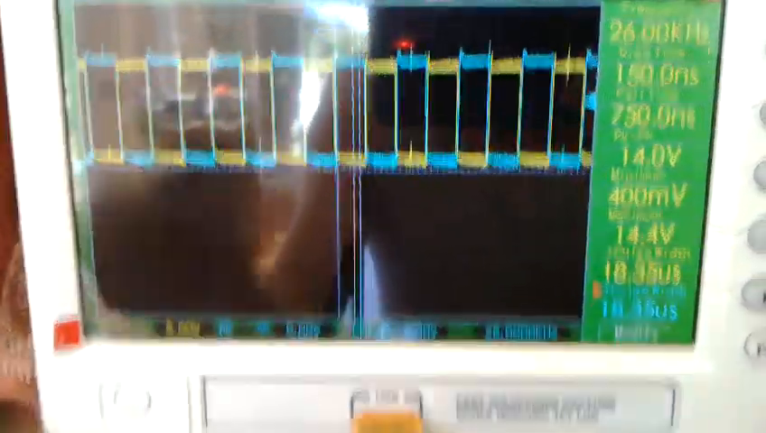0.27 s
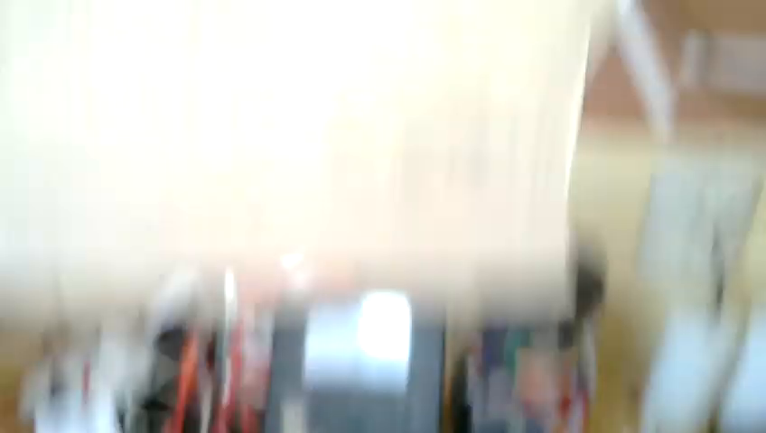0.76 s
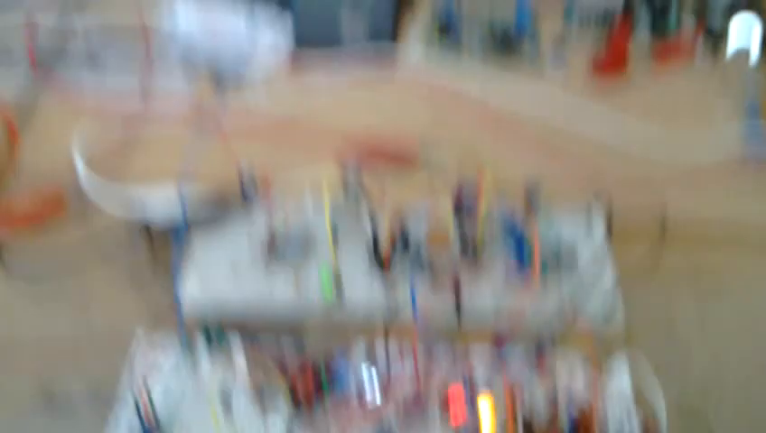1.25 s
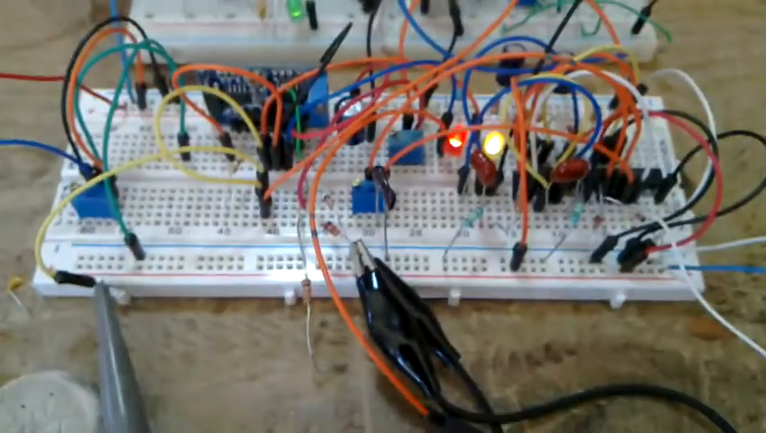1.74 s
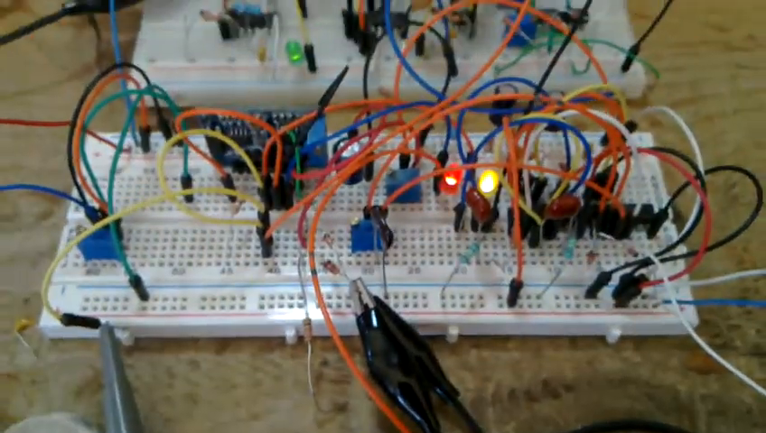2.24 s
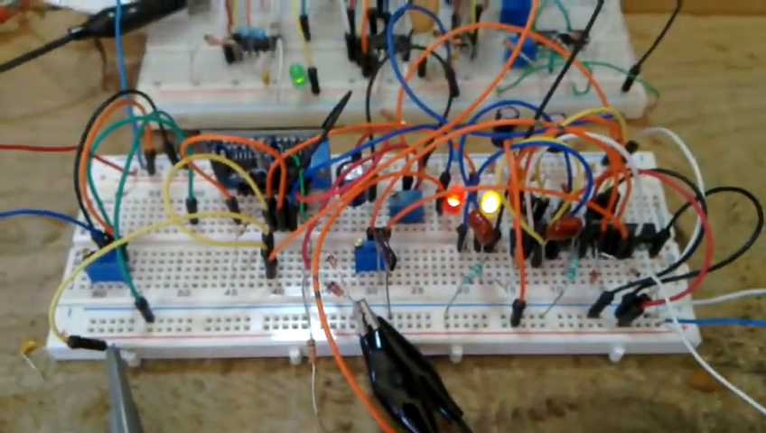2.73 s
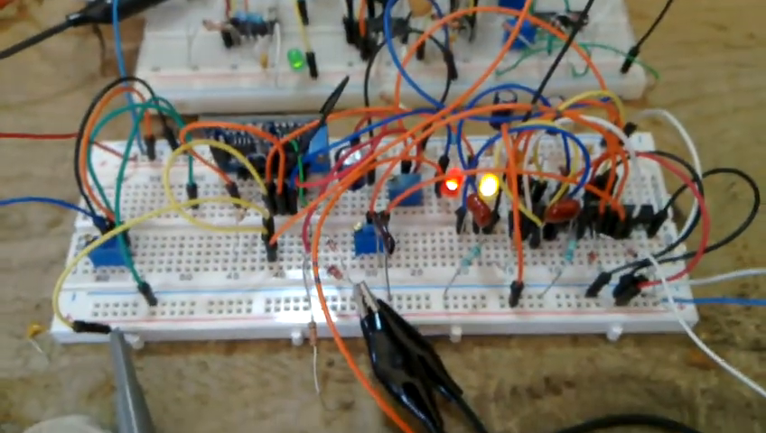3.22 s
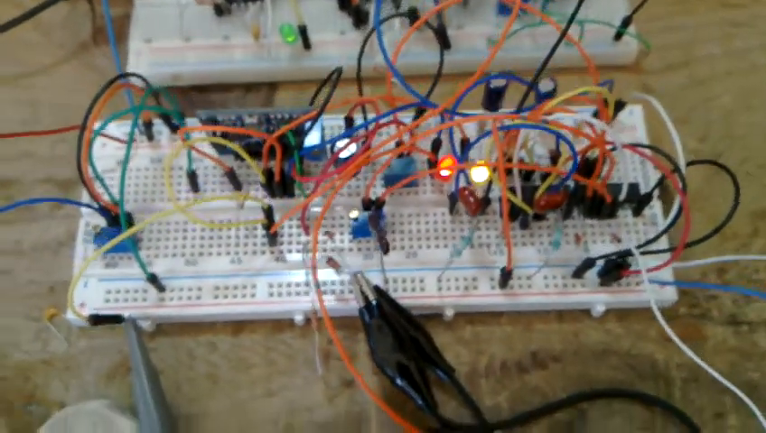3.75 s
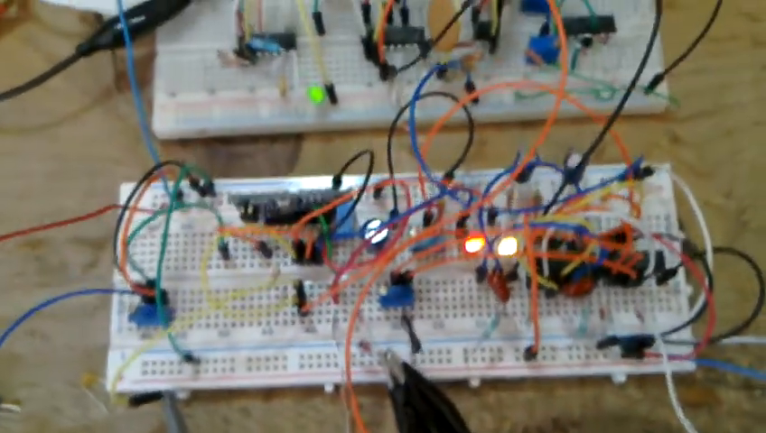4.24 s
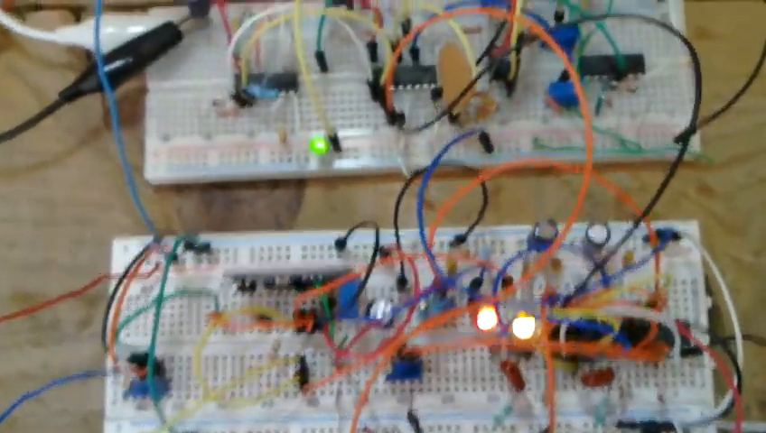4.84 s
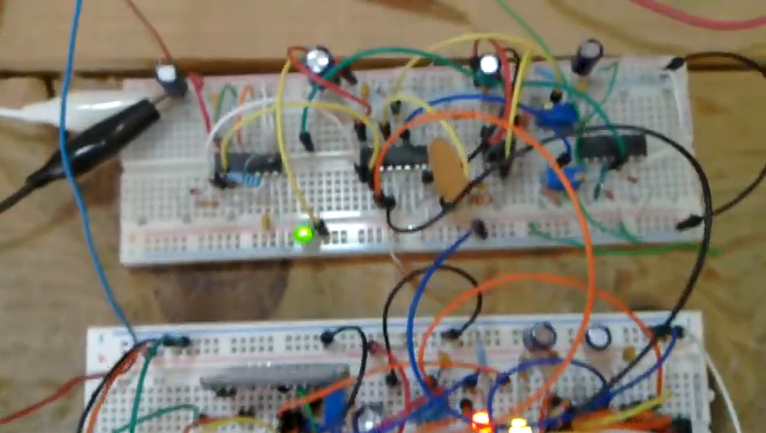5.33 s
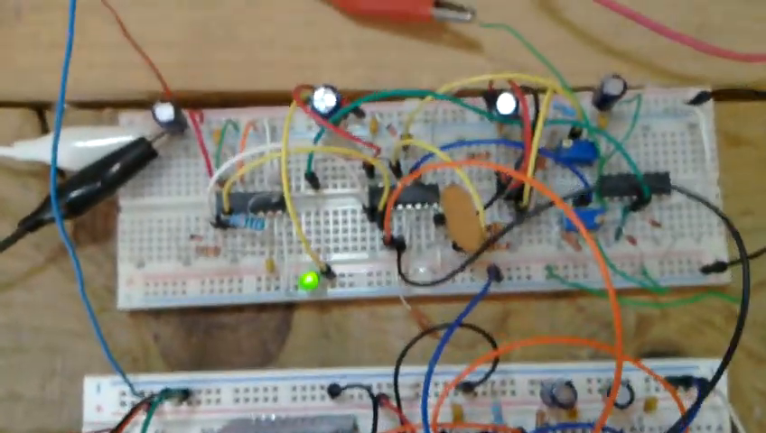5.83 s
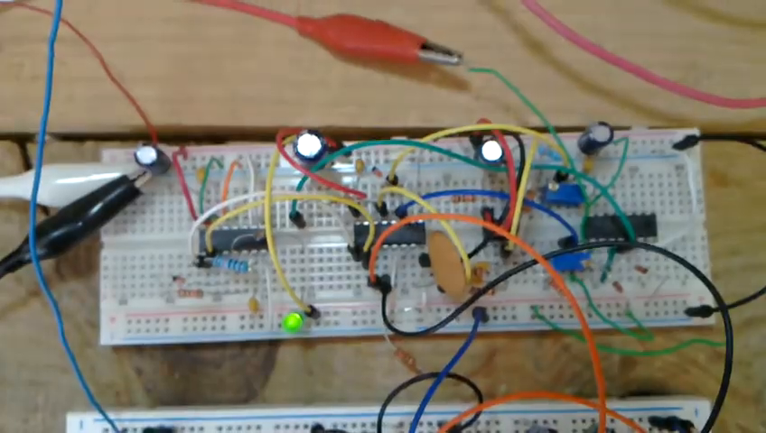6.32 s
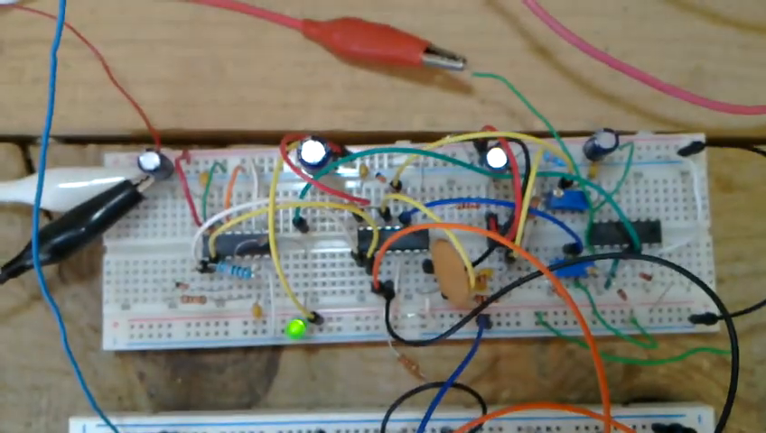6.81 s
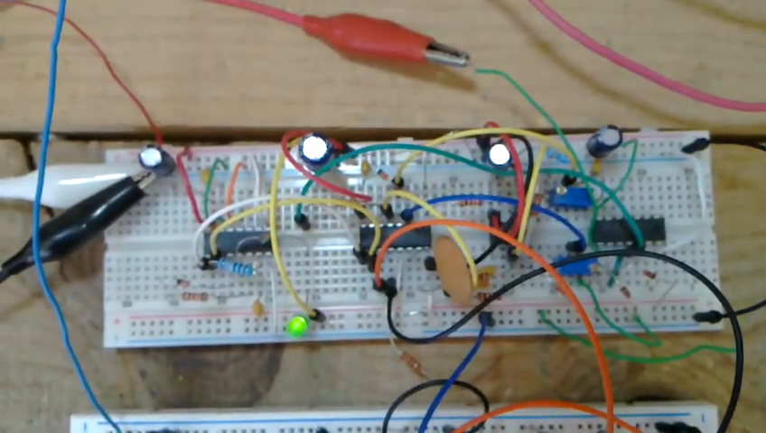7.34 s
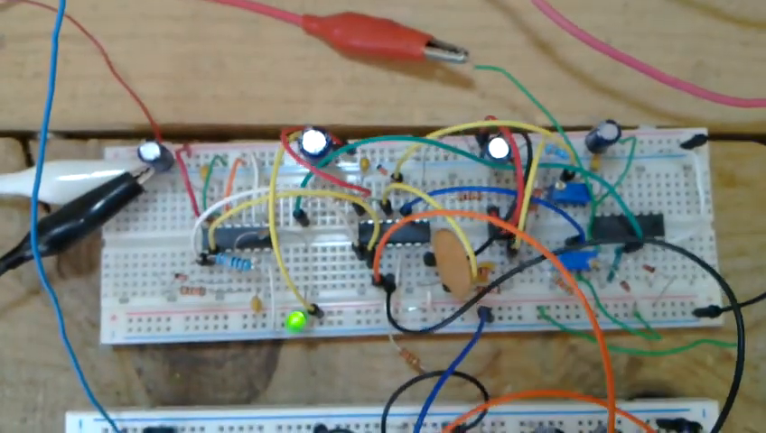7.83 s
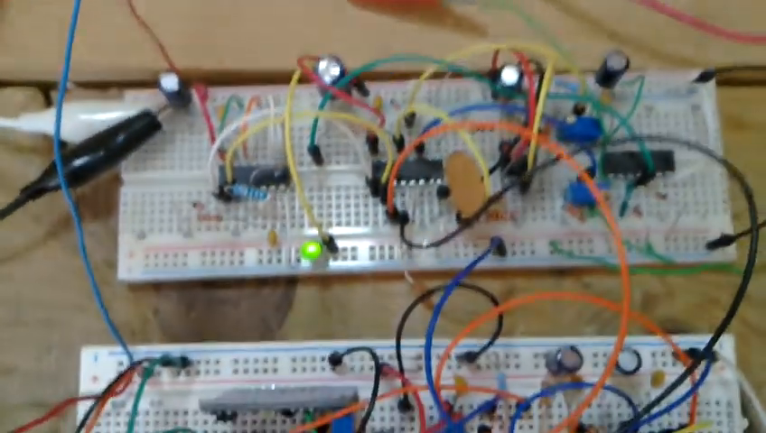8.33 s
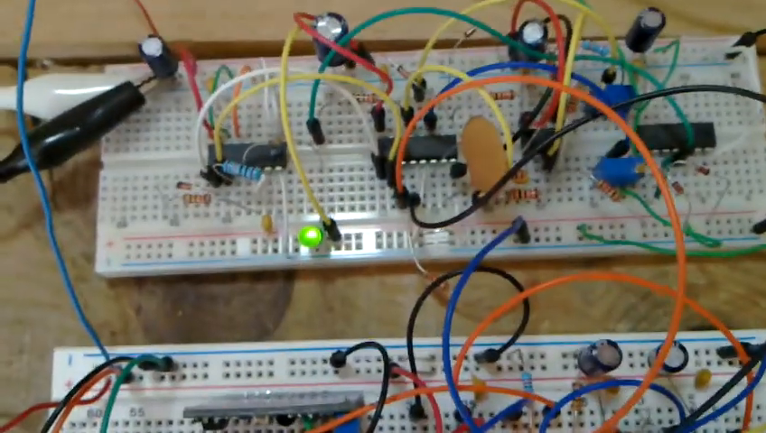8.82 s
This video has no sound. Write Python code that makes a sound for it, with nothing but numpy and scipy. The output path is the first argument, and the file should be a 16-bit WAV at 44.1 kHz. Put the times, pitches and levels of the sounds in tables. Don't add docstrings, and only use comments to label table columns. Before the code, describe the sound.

Steady electrical-sounding fan hum with wavering breathy hiss on a workbench, a sharp knock early on, smaller clicks later, and low distant traffic drone.

```python
import sys
import numpy as np
from scipy import signal
from scipy.fft import rfft, irfft, next_fast_len
from scipy.io import wavfile
from scipy.ndimage import uniform_filter1d

SR = 44100
rng = np.random.default_rng(int(sys.argv[2]) if len(sys.argv) > 2 else 0)


def elevation(decibels):
    levels = np.asarray(decibels, float)
    return 10 ** (levels / 20)


def pcm_store(signal):
    levels = np.round(np.clip(np.atleast_2d(signal), -1, 1) * 32767)
    wavfile.write(sys.argv[1], SR, levels.astype(np.int16).T)


N = 399987
T = np.arange(N) / SR

# (time [s], place [0 scope, 1 near board, 2 between, 3 far board], aim at the fan [dB],
# echo crest [Hz], closeness [dB])
HAND_PATH = [(0, 0, -11, 4170, -0.5), (.45, -0.06, -9, 4220, -0.5), (.73, 1.42, 1, 4230, -7),
             (.86, 0.5, 5.5, 4300, 1), (1.08, 1.37, 1, 4400, -1), (1.45, 1.5, -1, 4380, 1),
             (2.7, 1, 0, 4420, -0.5), (3.5, 1.08, 1.5, 4280, -1), (4.0, 1.5, -3.5, 3800, -1),
             (4.5, 2.5, -6, 3600, 1), (5.2, 2, 0, 3800, 0.5), (5.7, 2.5, .5, 3920, 1),
             (6.2, 4, .5, 3810, .5), (7.1, 5, .5, 3820, 0), (8.2, 2.5, 1.5, 3820, 0.5),
             (8.65, 2.5, 0, 4250, 0.5), (9.07, 2.5, 0, 4330, -0.5)]
# (multiple of the pitch, level at scope [dB], near board [dB], between [dB], far board [dB])
MOTOR_TONES = [(1, -66, -51, -49.5, -51.5), (3, -64.5, -56, -61, -64), (4, -63.5, -55, -56.5, -68),
               (5, -66.5, -52.5, -56.5, -57), (2, -64, -66.5, -71, -72.5), (10, -79.5, -63.5, -71, -60.5),
               (15, -74, -62, -69.5, -60), (20, -109, -76.5, -84.5, -91), (6, -73.5, -71.5, -78, -82),
               (8, -87, -70.5, -74, -76), (12, -81, -67.5, -78, -94), (18, -105, -79, -90, -78.5),
               (7, -82, -76, -81, -73.5)]


def evened(x):
    return x / np.sqrt(np.mean(x ** 2) + 1e-20)


def read(points, hz):
    f, value = np.transpose(points)
    return np.interp(np.log(hz + 1), np.log(f + 1), value)


def columns(rows, t):
    s, *rest = np.transpose(rows)
    return np.array([np.interp(t, s, c) for c in rest])


def bump(x, centre, half_width):
    return np.exp(-((x - centre) / half_width) ** 2)


def wander(low_hz, top_hz, t):
    rates, turns = np.geomspace(low_hz, top_hz, num=24), rng.random(24)
    return evened(np.sin(2 * np.pi * (np.outer(t, rates) + turns)).sum(1))


def slow(low_hz, top_hz):
    return np.interp(T, T[::200], wander(low_hz, top_hz, T[::200]))


def noise(field_db, size=1024):
    hop = size // 4
    hz, s = np.fft.rfftfreq(size, 1 / SR), np.arange(N // hop + 5) * hop / SR
    a, b = rng.standard_normal((len(s), len(hz), 2)).T
    spectrum = (a + 1j * b) * elevation(field_db(hz[:, None], s))
    return signal.istft(spectrum, nperseg=size, noverlap=size - hop)[1][:N]


def ring(hz, t60, length=3000):
    t = np.arange(length) / SR
    return elevation(-60 * t / t60) * np.sin(2 * np.pi * hz * t)


def add(mix, s, sound):
    part = mix[round(s * SR):][:len(sound)]
    part += sound[:len(part)]


def at_place(values, s):
    return np.interp(columns(HAND_PATH, s)[0], np.arange(len(values)), values)


def air_change(hz, s):
    centres_hz = [600, 2200, 4000, 5600]
    follows = [0.027, 0.19, 0.93, 0.52]
    share = np.interp(np.log(hz + 1), np.log(centres_hz), follows)
    return np.outer(share, columns(HAND_PATH, s)[1] + 1.83)


def tone_db(multiple, s):
    # (time [s], multiple, half length [s], level [dB])
    nodes = [(0.53, 1, 0.05, -12), (0.59, 1, 0.17, -10), (0.65, 3, 0.35, 6.5), (1.125, 3, 0.12, -15.5),
             (3.81, 3, 0.22, -10), (0.68, 4, 0.32, 6), (0.96, 4, 0.052, -16), (1.29, 4, 0.13, 3.5),
             (4.02, 4, 0.22, 2.5), (0.17, 5, 0.046, -16), (0.49, 5, 0.051, 7.5), (0.88, 5, 0.17, 5),
             (1.125, 5, 0.074, -17), (4.16, 5, .07, -9), (3.15, 5, 0.37, 3.5), (0.66, 15, 0.28, 11.5),
             (1.11, 15, 0.087, -30), (2.96, 15, 0.11, 4.5), (3.6, 15, 0.074, 0), (4.46, 15, 0.21, -9),
             (5.3, 15, 0.32, 8), (5.18, 10, 0.14, -16.5), (0.83, 10, 0.04, 14), (5.3, 20, .35, 9),
             (8.1, 20, .35, 1), (3.0, 6, 0.28, 7), (8.58, 8, 0.89, 9.5), (9.2, 7, 0.44, 6.5),
             (9.07, 18, .35, 16), (0.92, 12, 0.28, 4),
             (8.84, 1, .9, -2), (4.7, 1, 0.86, 0.5), (.05, 1, 0.22, 2.5), (2.9, 3, 0.71, -4.5),
              (1.14, 3, 0.32, 4), (8.87, 3, 0.33, 3.5), (5.4, 3, 0.12, -3), (5.4, 2, 0.28, -8.5),
              (9.16, 2, 0.41, 4.5), (2.04, 5, 0.29, 2), (4.93, 5, 0.23, -4), (6.05, 5, 0.49, 1.5),
              (6.95, 5, 0.55, -1.5), (0.676, 5, 0.028, -12), (3.75, 10, 0.37, 5), (8.75, 15, 0.21, -3),
              (1.52, 15, 0.11, -12), (5, 4, 0.15, 2), (5, 4, 0.22, -4.5), (9.4, 4, 0.95, 3),
              (1.4, 20, 0.14, 4), (2.3, 20, 0.13, -4), (.66, 2, 0.13, 5.5), (0.84, 15, 0.055, 2.5),
              (.88, 8, .06, 10), (1.15, 8, .1, 6), (.51, 3, .06, 3), (3.5, 20, 0.11, 5), (6.9, 3, .15, 1.5),
              (8.05, 3, .2, -1.5), (4.5, 4, .12, 2.5), (7.7, 4, .2, 2.5), (3.35, 15, .12, -3),
              (0.65, 3, .07, -3), (8.0, 2, .35, -3), (4.65, 2, .2, 2.5), (2.5, 2, .15, -3.5),
              (3.7, 8, 0.16, -5), (7.4, 8, .4, -3), (5.1, 8, .25, 2.5), (1.02, 1, .08, -1.5)]
    levels = next(row[1:] for row in MOTOR_TONES if row[0] == multiple)
    crossed = sum(db * np.exp(-abs((s - at) / half) ** 1.86)
                  for at, k, half, db in nodes if k == multiple)
    return at_place(levels, s) + columns(HAND_PATH, s)[3] + crossed


def motor(gust):
    # (time [s], pitch [Hz])
    pitch_curve = [(0.1, 322.25), (0.45, 321.81), (0.9, 320.95), (1.4, 320.45), (2.1, 320.56),
                   (2.7, 321.27), (3.2, 321.64), (3.7, 321.62), (4.3, 320.88), (4.75, 320.39),
                   (5.3, 320.61), (6.0, 321.61), (6.5, 321.97), (7.2, 322.16), (7.6, 322.09), (8.2, 322.31),
                   (8.7, 322.66), (9.0, 322.61)]
    # (multiple, level [dB])
    faint_tones = [(11, -77.5), (13, -74.5), (14, -80), (16, -81.5), (17, -89), (19, -86.5)]
    gust_share = 0.6
    spread_turns = .15
    hz = columns(pitch_curve, T)[0]
    turns = np.cumsum(hz) / SR + 0.0002 * slow(1.1, 40)
    out = np.zeros(N)
    for k in [row[0] for row in MOTOR_TONES]:
        db = np.interp(T, T[::128], tone_db(k, T[::128]))
        depth_db = min(0.16 * k, 1.7) if k % 5 == 0 else .15
        shiver_db = depth_db * evened(gust_share * gust + (1 - gust_share) * slow(7, 50))
        phase = k * turns + spread_turns * k * k + rng.random() / 20
        out += elevation(db + shiver_db) * np.cos(2 * np.pi * phase)
    for k, db in faint_tones:
        near_db = np.interp(T, T[::512], air_change(k * hz[:1], T[::512])[0])
        swell_db = slow(0.69, 2.9)
        out += elevation(db + near_db + swell_db) * np.cos(2 * np.pi * (k * turns + rng.random()))
    return np.sqrt(2) * out, turns


def air(turns, gust):
    # (frequency [Hz], level [dB per Hz])
    air_colour = [(150, -25), (270, -27), (330, -14), (450, -21), (600, -17.5), (1000, -14.5), (1650, -14),
                  (2200, -13.5), (3300, -13.5), (4800, -10), (5300, -18), (6500, -29), (7500, -43.5),
                  (9500, -56)]
    # (time [s], half length [s], frequency [Hz], half width [Hz], level [dB])
    sweeps = [(0.57, .16, 5100, 370, 7), (.64, 0.094, 3150, 280, -6), (1.14, .17, 3950, 190, 7.5),
              (1.2, .13, 4300, 180, -7.5), (0.97, 0.23, 5200, 410, -7), (.25, .2, 2100, 500, -2.5),
              (0.53, 0.19, 620, 180, 4), (4.2, 0.22, 4300, 500, -2.5), (8.4, 0.48, 640, 150, -4),
              (3.7, .22, 5000, 110, 7), (3.8, .35, 5550, 250, -5), (3.6, .2, 4680, 90, -5),
              (3.85, 0.21, 4100, 110, 4.5), (3.65, .2, 3900, 90, -2), (3.1, .2, 4080, 80, -7),
              (3.6, .12, 3480, 90, 3), (4.4, .25, 3050, 80, 5), (4.8, .3, 3320, 70, 5),
              (4.8, .15, 3100, 70, -9), (4.5, .2, 5050, 150, 4), (5.15, .35, 5100, 200, -4),
              (4.1, .3, 4350, 120, 8), (8.3, 0.23, 3300, 350, -1), (8.4, 0.47, 4280, 120, 3.5),
              (4.5, .2, 870, 200, 2), (1.34, .06, 2300, 300, -5)]
    # frequency [Hz], depth [dB], width [Hz]
    low_dip_hz = [2870, 2770, 2390, 2420]
    low_dip_db = [10.4, 8.3, 6.6, 7]
    low_dip_width_hz = [338, 189, 150, 170]
    # depth [dB], share of the crest frequency
    flank_dip_db = [1.5, 8.6, 4.9, 11]
    flank_share = [.9, 0.91, 0.9, 0.902]
    high_dip_db = [1.5, 3, 5, 13]
    # frequency [Hz], depth [dB]
    mid_dip_hz = [3530, 2900, 3010, 3000]
    mid_dip_db = [4.8, 1.2, 7.3, 1]
    crest_db = [1.7, 4.3, 5.5, 6.6]
    low_crest_db = [1.1, 3, 1.9, 2.8]
    housing_hz = [4800, 4750, 4560, 4820]
    housing_db = [3.7, 2.8, 9.9, 1.94]
    notch_db = [4, 9.4, 2, 10]
    gap_db = [0.5, -.5, 3.5, 1.3]

    def field(hz, s):
        place, _, crest_hz, _ = columns(HAND_PATH, s)
        db = read(air_colour, hz) + air_change(hz[:, 0], s)
        high_dip_hz = 4420 + 0.61 * (crest_hz - 3850)
        dips = [(at_place(low_dip_hz, s), low_dip_db, at_place(low_dip_width_hz, s)),
                (at_place(flank_share, s) * crest_hz, flank_dip_db, 110),
                (high_dip_hz, high_dip_db, 140),
                (at_place(mid_dip_hz, s), mid_dip_db, 110)]
        for f, depth_db, width in dips:
            db = db - at_place(depth_db, s) * np.exp(-abs((hz - f) / width) ** 1.4)
        db = db + at_place(crest_db, s) * bump(hz, crest_hz, 260)
        db = db + at_place(low_crest_db, s) * bump(hz, 0.785 * crest_hz, 170)
        housing_rise_db = 0.62 * np.maximum(tone_db(15, s) + 63.5, -8)
        db = db + (at_place(housing_db, s) + housing_rise_db) * bump(hz, at_place(housing_hz, s), 140)
        db = db - at_place(notch_db, s) * bump(hz, 5030, 90)
        db = db + at_place(gap_db, s) * (bump(hz, 880, 220) + bump(hz, 2140, 220))
        db = db - 3.1 * bump(hz, 6050, 110) * np.clip(place - 2, 0, 1)
        db = db + .5 * np.maximum(tone_db(1, s) + 52.5, -13) * bump(hz, 330, 140)
        db = db + 7.8 * bump(hz, 570, 70) * np.clip((.9 - place) / 0.22, .15, 1)
        for at, half, f, width, swing_db in sweeps:
            db = db + swing_db * bump(s, at, half) * bump(hz, f, width)
        patches = uniform_filter1d(rng.standard_normal(db.shape), 14, 0)
        patches = evened(uniform_filter1d(patches, 3, 1))
        gust_db = 0.68 * np.interp(s - 512 / SR, T, gust)
        bright = 0.42 + bump(hz, 4200, 1800)
        return db + bright * (0.38 * wander(9, 70, s) + gust_db + 0.9 * patches)

    flutter = elevation(-53 + 0.74 * slow(25, 100))
    puffs = 1 + 0.017 * np.cos(2 * np.pi * turns) + 0.034 * np.cos(np.pi * turns)
    return flutter * evened(noise(field)) * puffs


def bench():
    # (frequency [Hz], early level [dB], late level [dB])
    supply_tones = [(586, -78, -83), (801, -75, -81), (1087, -79, -72), (1372, -81, -74), (1855, -86, -80),
                    (6600, -92, -94), (7380, -96, -97), (7768, -96, -95), (8156, -93, -95),
                    (8543, -90, -90), (9318, -93, -94), (10874, -96, -97), (14497, -99, -95)]
    late = np.clip((columns(HAND_PATH, T)[0] - 1) / 2, 0, 1)
    out = np.zeros(N)
    for hz, early_db, late_db in supply_tones:
        db = early_db + late * (late_db - early_db) + 0.46 * slow(0.28, 0.72)
        out += elevation(db) * np.sin(2 * np.pi * hz * T)
    return np.sqrt(2) * out * elevation(at_place([-6, 0], T))


def hiss(gust):
    # (frequency [Hz], level [dB per Hz])
    hiss_colour = [(3000, -21), (6500, -3), (8400, -2.5), (10300, -3), (12000, -1), (15000, -0.5),
                   (17000, -1)]

    def field(hz, s):
        stir_db = .2 * wander(8, 60, s) + .45 * np.interp(s - 512 / SR, T, gust)
        return read(hiss_colour, hz) + stir_db

    return elevation(-70.5 + 0.33 * columns(HAND_PATH, T)[1]) * evened(noise(field))


def rumble():
    # (frequency [Hz], level [dB per Hz])
    rumble_colour = [(15, -10), (30, -31), (60, 3), (80, -10), (115, 0.5), (180, -7.5), (240, 5.5),
                     (300, 2), (450, -38)]
    rumble_db = [-81.5, -79, -75.5, -74.5]
    # (time [s], half length [s], level [dB])
    drones = [
        (6.25, .25, 9.4),
        (6.75, .15, 8),
        (7.1, 0.14, 8),
        (7.9, 0.23, 8),
        (8.6, .3, 9.7),
    ]

    def field(hz, s):
        swell_db = sum(db * bump(s, at, half) for at, half, db in drones)
        return read(rumble_colour, hz) + bump(hz, 109, 22) * swell_db

    return elevation(at_place(rumble_db, T)) * evened(noise(field, size=4096))


def relay():
    # (frequency [Hz], level [dB], t60 [s])
    tick_modes = [(7000, -61, 0.012), (7900, -66, .012), (8600, -63, .014), (9160, -61, .012),
                  (10200, -69, 0.023), (12300, -66, .012)]
    start_s, gap_s, rise_s = .0228, .4708, .0012
    out = np.zeros(N)
    rise = np.minimum(np.arange(3000) / SR / rise_s, 1) ** 2
    for s in np.arange(start_s, N / SR, gap_s):
        for hz, db, t60 in tick_modes:
            level_chance, pitch_chance = rng.standard_normal(2)
            mode = ring(hz * (1 + 0.016 * pitch_chance), t60)
            add(out, s, rise * elevation(db + 2.2 * level_chance) * mode)
    return out


def clicks():
    # (time [s], peak [dB], ring [Hz], t60 [s], crack [dB])
    click_events = [(.13, -53, 5330, .014, .5), (.335, -53, 5200, .014, 5), (.47, -61, 5600, .01, 8),
                    (.74, -54, 6000, .01, 5), (0.774, -42, 3200, 0.01, 2), (1.3010, -49, 11500, 0.008, 7),
                    (4.282, -64, 8400, .01, 5), (3.155, -46, 5500, .006, -3), (3.156, -39, 2710, .006, 6),
                    (1.185, -37, 830, 0.0066, 2), (3.512, -54, 2000, .004, 1), (7.862, -67, 8500, .01, 14),
                    (4.782, -66, 8300, .01, 8), (8.087, -60, 8300, .01, 8), (8.59, -66, 8000, .01, 11)]
    out, n = np.zeros(N), np.arange(300)
    for s, db, hz, t60, crack_db in click_events:
        body = ring(hz, t60) * np.minimum(np.arange(3000) / 23.0, 1)
        crack = rng.standard_normal(300) * np.exp(-n / 70.0) * np.minimum(n / 10, 1)
        crack_hz = 1500 + 0.7 * hz
        band = signal.butter(3, [.7 * crack_hz, 1.3 * crack_hz], "bandpass", fs=SR)
        add(body, 0, elevation(crack_db) * signal.lfilter(*band, crack))
        add(out, s, elevation(db) * body)
    return out


def creaks():
    creaks_per_s = [1, 3, 15, 3]
    slot_s = .01
    out, slots = np.zeros(N), np.arange(0, N / SR, slot_s)
    for s, rate in zip(slots, at_place(creaks_per_s, slots)):
        luck, pitch, strength = rng.random(3)
        if luck < rate * slot_s:
            hz = np.interp(pitch, [0, 1], [6900, 12500])
            add(out, s, elevation(-66 + 6.0 * (strength - .5)) * ring(hz, .006, length=800))
    return out


def rustles():
    # (time [s], length [s], level [dB])
    strokes = [
        (0.751, 0.1, -52),
        (0.884, 0.13, -54.5),
        (1.078, 0.069, -55.5),
        (1.247, 0.076, -54),
        (1.284, 0.12, -51),
    ]
    # (frequency [Hz], level [dB])
    skin_colour = [(300, -11), (1000, 1.5), (3000, -0.5), (5000, -1), (7000, -11.5), (9000, -17.5),
                   (16000, -22)]
    out = np.zeros(N)
    skin = evened(noise(lambda hz, s: read(skin_colour, hz) + 1.9 * wander(22, 150, s), size=256))
    for s, length, db in strokes:
        stroke = signal.windows.tukey(round(length * SR), .75)
        add(out, s, elevation(db) * stroke * skin[round(s * SR):][:len(stroke)])
    return out


def knocks():
    # (time [s], peak [dB], frequency [Hz], length [cycles])
    knock_events = [(1.30074, -24, 1200, 3.5), (1.3006, -43, 480, 1.5), (1.30108, -28, 3000, 1.5),
                    (1.30190, -27, 2500, 1.5), (1.3008, -32, 3500, 7), (1.30150, -34, 5000, 6),
                    (1.3014, -46, 7600, 9), (.8197, -31.5, 5200, 2.5), (.8203, -38, 2000, 3),
                    (.8206, -30, 3500, 3.5), (.8214, -33, 3600, 5), (.8240, -35, 1900, 3),
                    (.7716, -41, 2400, 4), (.7722, -38, 3500, 6), (.7752, -38, 3800, 7),
                    (.7965, -39, 4100, 6), (.7975, -50, 6500, 9), (.8026, -37, 4400, 5),
                    (.8045, -50, 6600, 9), (.8060, -39, 4700, 7), (.8243, -42, 3300, 4),
                    (.8450, -41, 4600, 18), (.8505, -41, 4700, 14), (.8570, -39, 3800, 6),
                    (.8572, -56, 7800, 9), (3.4292, -41, 3300, 4), (3.4294, -45, 5400, 5),
                    (3.4306, -38.5, 3300, 6), (3.4312, -43, 1900, 3), (3.1550, -44, 5200, 5),
                    (3.1562, -42, 3000, 4), (3.1600, -41, 4600, 14), (8.6845, -38, 4300, 24)]
    out = np.zeros(N)
    for s, db, hz, cycles in knock_events:
        turns = np.arange(0, cycles, hz / SR)
        swell = np.sin(np.pi * turns / cycles) ** 2
        add(out, s, elevation(db) * swell * np.sin(2 * np.pi * turns))
    return signal.lfilter(*signal.butter(2, 300, "highpass", fs=SR), out)


def snaps():
    # (time [s], peak [dB])
    snap_events = [
        (.7722, -42),
        (.8199, -39),
        (1.3021, -45),
        (3.1552, -46),
        (3.4298, -42),
    ]
    decay_s = 0.00045
    out, t = np.zeros(N), np.arange(256) / SR
    top, low = signal.butter(2, 5000, fs=SR), signal.butter(2, 1800, "highpass", fs=SR)
    for s, db in snap_events:
        burst = rng.choice([-1., 1.], 256) * np.exp(-t / decay_s)
        add(out, s, elevation(db) * signal.lfilter(*low, signal.lfilter(*top, burst)))
    return out


def thumps():
    # (time [s], peak [dB], frequency [Hz], t60 [s])
    thump_events = [
        (.827, -62, 62, 0.093),
        (3.51, -52, 110, 0.024),
    ]
    out = np.zeros(N)
    for s, db, hz, t60 in thump_events:
        add(out, s, elevation(db) * ring(hz, t60, length=8000))
    return out


def scene():
    gust = slow(7, 59.96)
    tones, turns = motor(gust)
    fan = tones + air(turns, gust)
    surroundings = bench() + hiss(gust) + rumble() + relay()
    hand = clicks() + creaks() + rustles() + knocks() + snaps() + thumps()
    return (fan + surroundings + hand)[None]


def low_pass(x):
    return signal.sosfilt(signal.butter(12, 16250, fs=SR, output="sos"), x)


def record(dry):
    edge_hz = 15745
    size = next_fast_len(N)
    passed = np.fft.rfftfreq(size, 1 / SR) < edge_hz
    limited = irfft(rfft(dry, size) * passed, size)[:, :N]
    return low_pass(limited)


dry = scene()
out = record(dry)
pcm_store(out)
```